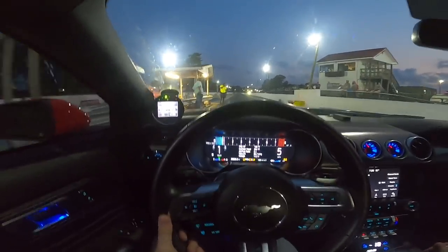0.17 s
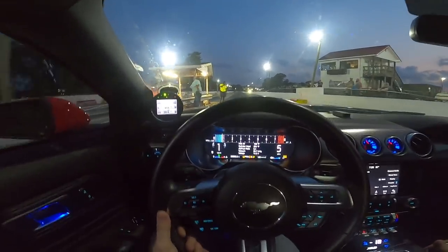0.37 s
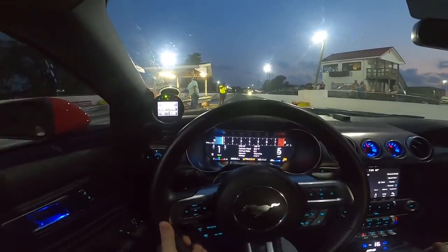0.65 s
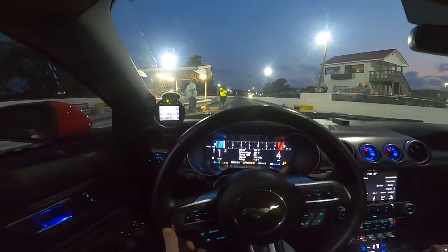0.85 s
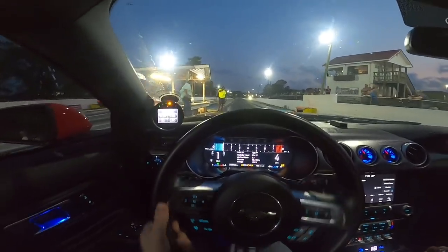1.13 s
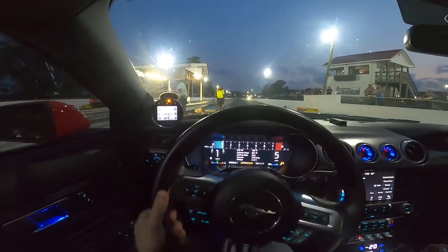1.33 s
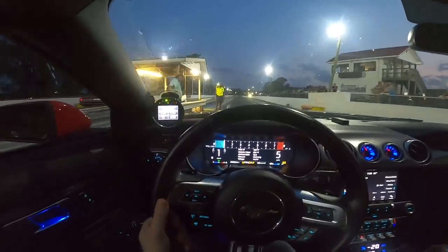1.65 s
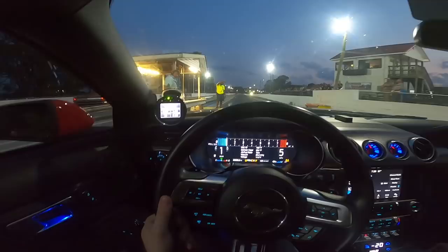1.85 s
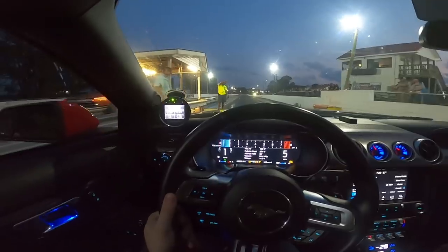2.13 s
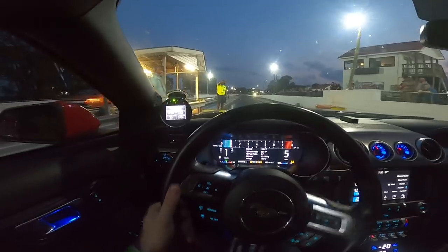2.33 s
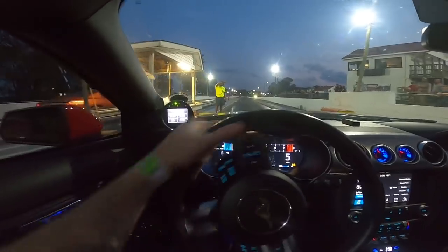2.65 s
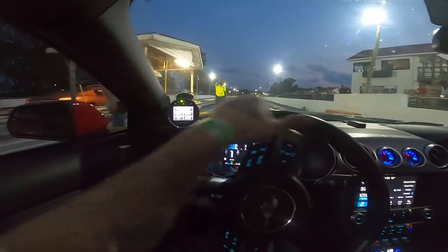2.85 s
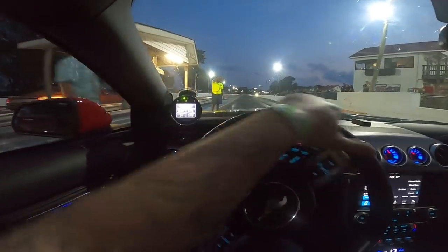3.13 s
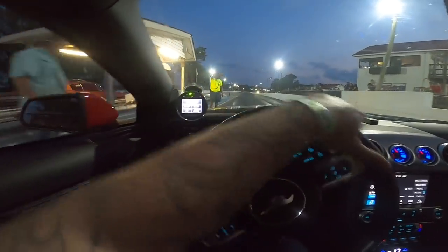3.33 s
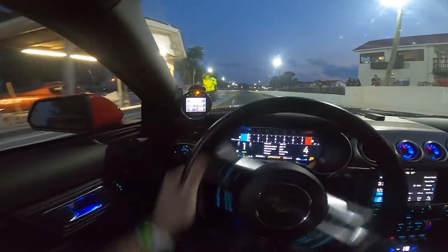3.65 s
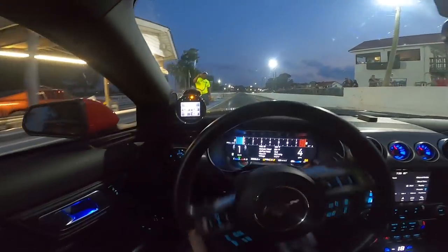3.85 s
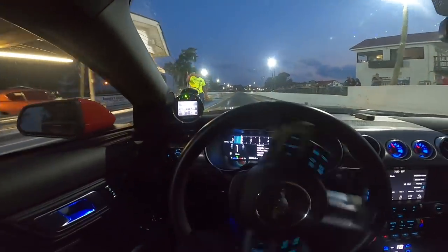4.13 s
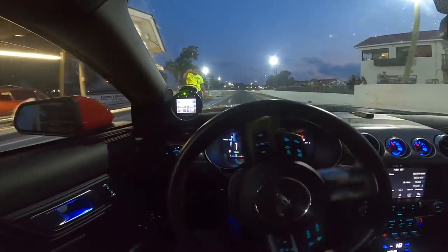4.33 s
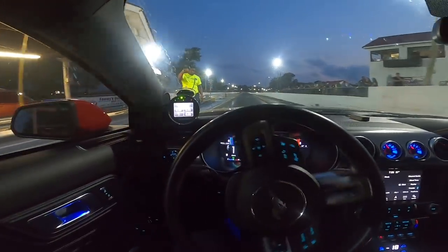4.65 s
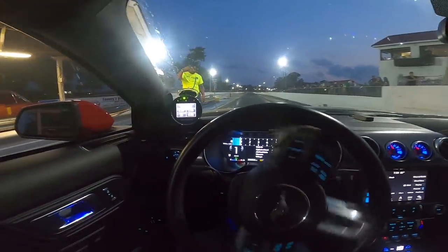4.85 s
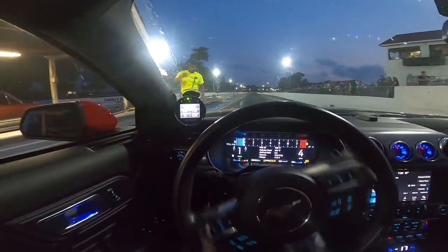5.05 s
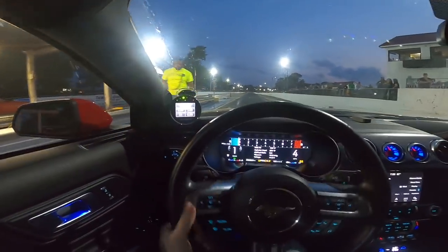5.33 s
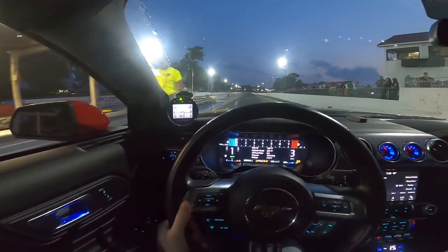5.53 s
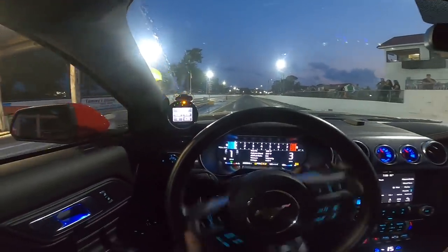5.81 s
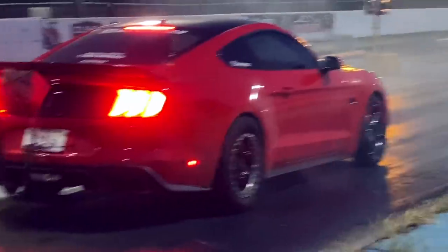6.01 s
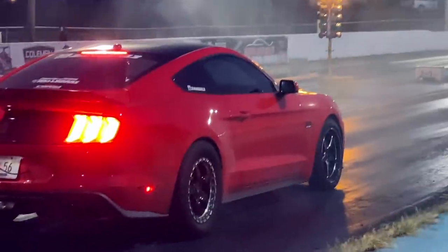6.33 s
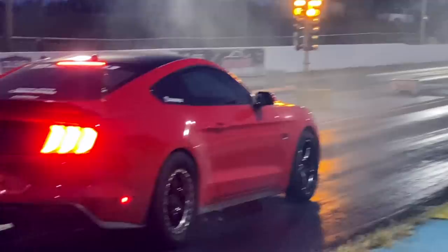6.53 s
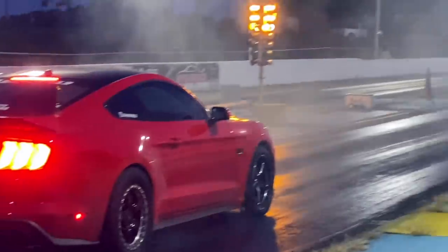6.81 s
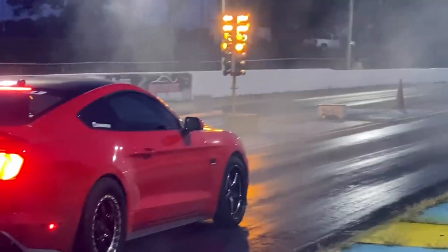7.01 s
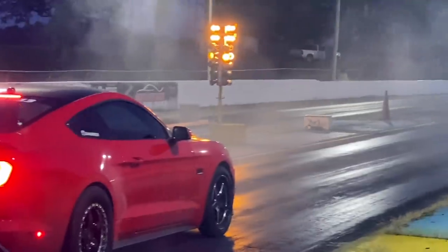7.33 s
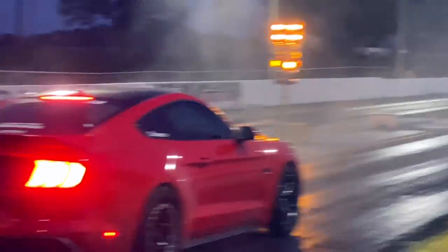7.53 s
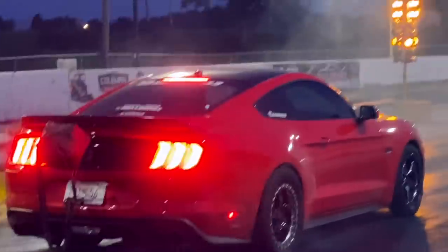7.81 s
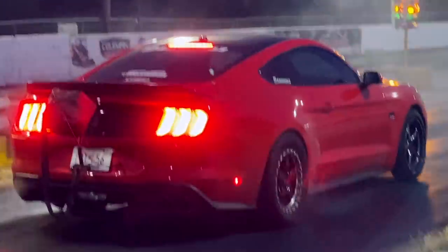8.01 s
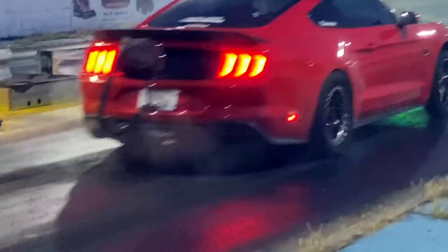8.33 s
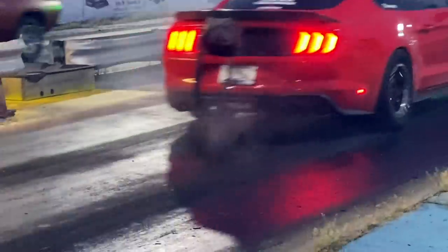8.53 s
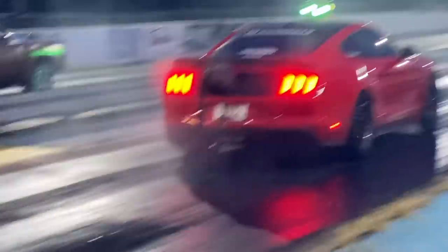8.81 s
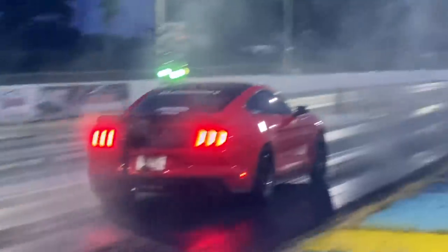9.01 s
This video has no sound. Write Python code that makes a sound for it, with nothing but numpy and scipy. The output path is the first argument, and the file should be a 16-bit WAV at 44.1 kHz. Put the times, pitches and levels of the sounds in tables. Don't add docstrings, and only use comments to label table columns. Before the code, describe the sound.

Inside a closed car, a low engine boom with muffled outside revs, wheel creaks and rubs; then a lumpy trackside engine roars away at full throttle.

```python
import sys
import numpy as np
from scipy import signal
from scipy.fft import rfft, irfft, next_fast_len
from scipy.io import wavfile

SR = 44100
rng = np.random.default_rng(int(sys.argv[2]) if len(sys.argv) > 2 else 0)


def decibels_to_gain(level_db):
    exponent = np.asarray(level_db, float) / 20
    return 10 ** exponent


def to_wav(sig):
    pcm = np.clip(np.atleast_2d(sig), -1, 1) * 32767
    pcm = np.round(pcm).astype(np.int16)
    wavfile.write(sys.argv[1], SR, pcm.T)


N = 403956


def rms_one(x):
    return x / np.sqrt(np.mean(x ** 2) + 1e-20)


def in_time(rows):
    s, *columns = np.transpose(rows)
    at = np.arange(max(round(s[0] * SR), 0), min(round(s[-1] * SR), N))
    return at, [np.interp(at / SR, s, column) for column in columns]


def at_hz(points, hz):
    table_hz, table_db = np.transpose(points)
    return np.interp(np.log(hz), np.log(table_hz), table_db)


def drift(rate, size):
    r = np.exp(-80 * np.pi * rate / SR)
    white = rng.standard_normal(size // 40 + 2002)
    slow = signal.lfilter([1], [1, -2 * r, r * r], white)[2000:]
    return np.interp(np.arange(size) / 40, np.arange(len(slow)), rms_one(slow))


def noise(spectrum, size, patchy_db):
    white = rng.standard_normal(next_fast_len(size))
    hz = np.arange(len(white) // 2 + 1) * SR / len(white) + 1e-3
    inside = (hz > spectrum[0][0]) & (hz < spectrum[-1][0])
    shaped = rfft(white) * decibels_to_gain(at_hz(spectrum, hz)) * inside
    coloured = irfft(shaped, len(white))[:size]
    return rms_one(coloured * decibels_to_gain(patchy_db * drift(17, size)))


def bump(t, s, width):
    return np.exp(-((t - s) / width) ** 2)


def bumps(rows, t):
    return sum(decibels_to_gain(db) * bump(t, s, width) for s, width, db in rows)


def rings(rows, t):
    out = np.zeros(len(t))
    for s, width, hz, band_hz, db in rows:
        near = np.abs(t - s) < 3 * width
        turn, size = 2 * np.pi * hz * t[near], near.sum()
        wave = drift(band_hz, size) * np.cos(turn) + drift(band_hz, size) * np.sin(turn)
        out[near] += bumps([(s, width, db)], t[near]) * wave
    return out


def bursts(times, levels_db, pitches_hz, below, above, decay):
    out, t = np.zeros(N), np.arange(1500) / SR
    shape = np.exp(-t / decay) * (1 - np.exp(-t / 0.00048))
    whites = rng.standard_normal((len(times), len(t)))
    for s, db, hz, white in zip(times, levels_db, pitches_hz, whites):
        band = signal.butter(2, [hz * below, min(hz * above, 15500)], "band", fs=SR, output="sos")
        start = round(s * SR)
        out[start:start + len(t)] += decibels_to_gain(db) * rms_one(signal.sosfilt(band, white)) * shape
    return out


def firing(cylinder_db, k):
    return np.angle(np.fft.fft(decibels_to_gain(cylinder_db)))[int(k) % 8]


CABIN_CYLINDERS = [0, -5, -5, 0, -9, -11, -11, -9]


def cabin_timing(k):
    return firing(CABIN_CYLINDERS, k) - 3.7 - .012 * k * k


def orders(turns, multiples, level_db, rough_db, slip, rate, timing=cabin_timing):
    out, size = np.zeros(len(turns)), len(turns)
    for k in multiples:
        scatter = 2 * np.pi * rng.random() * (k > 16)
        phase = 2 * np.pi * k * turns + timing(k) - scatter + slip * k * drift(rate, size)
        out += decibels_to_gain(level_db(k) + rough_db * drift(rate, size)) * np.cos(phase)
    return np.sqrt(2) * out


# (time [s], firing rate [Hz], boom level [dB])
OWN_IDLE = [(0, 51.5, -14), (0.42, 52.03, -10.5), (0.569, 59.73, -14), (0.839, 68.8, -12.5),
            (1.28, 70.53, -13.5), (1.43, 69.04, -19), (1.51, 67.9, -21), (1.78, 64.9, -14),
            (1.93, 60.05, -19.5), (2.42, 55.95, -14.5), (2.85, 51.69, -9.5), (3.14, 48.64, -12.5),
            (3.34, 51, -8.5), (3.62, 58.8, -12.5), (3.87, 58.53, -12), (4.07, 57.3, -11),
            (4.71, 57.76, -11.5), (5.08, 54.26, -10)]
# (multiple of firing rate, level above boom [dB])
UNEVEN_LINES = [(0.752, -26.5), (1.249, -35.5), (1.5, -31.5), (2.25, -33.5), (2.5, -27.5), (4, -31.5),
                (5, -34.5), (6, -42.5)]
# (frequency [Hz], level [dB])
PANEL_BUZZ = [(96, -37), (108, -36), (117, -27.5), (148, -30), (163, -30.5), (176, -39.5)]


def own_engine():
    _, last_hz, last_db = OWN_IDLE[-1]
    at, (hz, boom_db) = in_time([*OWN_IDLE, (6, last_hz + .7, last_db)])
    t, size = at / SR, len(at)
    loose = np.interp(t, (2.1, 2.4), [0, 1])
    levels = {k: loose * at_hz(PANEL_BUZZ, k * hz) + (1 - loose) * -37.5 for k in (2, 3)}
    levels.update({k: boom_db + db for k, db in UNEVEN_LINES})
    levels[18.1] = -71
    turns = np.cumsum(hz) / SR
    boom = np.cos(2 * np.pi * turns + 0.095 * drift(7.0, size))
    boom = np.sqrt(2) * decibels_to_gain(boom_db + drift(30, size)) * boom
    boom = boom * (1 - .92 * bump(t, 3.14, .021))
    return boom + orders(turns, levels, levels.get, rough_db=1.2, slip=0.06, rate=4)


# (time [s], engine cycles per second [Hz], exhaust level [dB], gas flow level [dB])
FIRST_BLIP = [
    (0, 43, -15.5, -34),
    (0.097, 41, -24, -37),
    (.222, 39, -27, -37.5),
    (.41, 28, -21, -43),
    (.57, 26, -21.5, -47.5),
    (0.699, 21.5, -26.5, -48),
    (0.851, 17.7, -23.5, -57),
    (1.15, 16.6, -32, -64),
]
SECOND_BLIP = [(1.28, 20.5, -36, -59.5), (1.38, 26.4, -17, -41), (1.49, 33.5, -16, -32),
               (1.58, 38.3, -13, -28), (1.655, 43.2, -13, -30.5), (1.72, 42.8, -29, -36),
               (1.77, 41.3, -27, -35), (1.83, 38.6, -17, -33.5), (2.03, 30.3, -16, -38.5),
               (2.22, 25, -17, -43), (2.31, 22.8, -22, -45.5), (2.46, 20.9, -22, -55),
               (2.72, 18.2, -28, -73), (2.95, 18.2, -24, -80), (3.45, 15.5, -34, -90)]
# (multiple of engine cycle, level [dB])
RIVAL_TONES = [(2, -18.5), (3, -4), (4, -3.5), (5, 1.5), (6, 1.5), (7, -9.5), (8, 0), (9, -12.5),
               (10, -13.5), (11, -13.5)]
# (frequency [Hz], level [dB])
BODY_LEAK = [(60, -24), (105, -13), (128, 0), (150, -8), (178, 0), (195, -9), (215, -15), (250, -24),
             (280, -15), (300, -4), (322, -16), (346, -3), (385, -16), (420, -11), (480, -20), (700, -38)]
# (frequency [Hz], level [dB])
SIDE_GLASS = [(180, -1.5), (215, 11.5), (260, 6.5)]


def rival_blip(rows):
    at, (hz, exhaust_db, _) = in_time(rows)
    table = dict(RIVAL_TONES)
    beside = np.interp(at / SR, (.15, .32), [1, 0])

    def level(k):
        return exhaust_db + table[k] + at_hz(BODY_LEAK, k * hz) + at_hz(SIDE_GLASS, k * hz) * beside

    heard = orders(np.cumsum(hz) / SR, table, level, rough_db=3.0, slip=.04, rate=12)
    since_start = at - at[0] + N * (at[0] == 0)
    fade = np.clip(np.minimum(at[-1] - at, since_start) / 2000, 0, 1)
    out = np.zeros(N)
    out[at] = heard * fade
    return out


def rival_gas(t):
    s, _, _, flow_db = np.transpose(FIRST_BLIP + SECOND_BLIP)
    flow_db = np.interp(t, s, flow_db, right=-120)
    above = np.maximum(flow_db + 52.5, 0)
    rumble = decibels_to_gain(-22.5 - 1.18 * t + 0.2 * above)
    roar = decibels_to_gain(flow_db) + decibels_to_gain(-62)
    overrun_db = np.interp(t, (.64, .71), [4, 0])
    hiss_db = flow_db - 15 - .09 * (flow_db + 37) + overrun_db
    return rumble, roar, decibels_to_gain(hiss_db) + decibels_to_gain(-77)


# (frequency [Hz], level [dB per Hz])
FAN_COLOUR = [(220, -39), (380, -10.5), (461, -8), (496, -9), (533, -7), (657, -22.5), (951, -19),
              (1050, -18), (1280, -19.5), (1630, -27.5), (2600, -38), (3380, -57.5), (5720, -120)]


def vents(size):
    return decibels_to_gain(-57) * noise(FAN_COLOUR, size, patchy_db=2.8)


# (frequency [Hz], level [dB per Hz])
RUMBLE_COLOUR = [(44, -28), (75, -7), (88, -21.5), (102, -17), (172, -13), (209, -20.5), (281, -23),
                 (363, -35), (480, -48.5), (620, -88), (1060, -120)]
ROAR_COLOUR = [(200, -24), (340, -6.5), (416, -0.5), (481, -5), (622, -7.5), (686, -14), (1180, -13),
               (1410, -14.5), (1740, -25), (2000, -22), (2600, -55.5), (4400, -120)]
HISS_COLOUR = [(1000, -32.5), (1700, -3), (2450, -6.5), (3000, -7.5), (3950, -10), (4970, -13.5),
               (5620, -12.5), (6580, -15.5), (9500, -36.5), (12400, -69.5), (20900, -120)]
# (delay [s], level [dB])
WINDOW_ECHOES = [
    (.00082, -17),
    (.0027, -15),
]


def echoed(x, echoes):
    out = x + sum(decibels_to_gain(db) * np.roll(x, round(s * SR)) for s, db in echoes)
    return out / np.sqrt(1 + sum(decibels_to_gain(2 * db) for _, db in echoes))


def cabin_air(rumble_gain, roar_gain, hiss_gain):
    size = len(rumble_gain)
    rumble = rumble_gain * noise(RUMBLE_COLOUR, size, patchy_db=1.2)
    roar = roar_gain * noise(ROAR_COLOUR, size, patchy_db=1.8) + vents(size)
    hiss = hiss_gain * echoed(noise(HISS_COLOUR, size, patchy_db=1.0), WINDOW_ECHOES)
    return rumble, roar, hiss


# (frequency [Hz], level [dB per Hz])
THUMP_COLOUR = [(14, -14), (22, -1), (36, -4.5), (48, -16.5)]
# (time [s], width [s], level [dB])
BODY_JOLTS = [
    (0, 0.94, -33),
    (1.312, .045, -17),
    (1.58, 0.11, -37),
    (2.6, .2, -34),
    (3.28, .13, -32),
    (4.4, .5, -32),
]


def body_thump(t):
    gain = decibels_to_gain(-32) + bumps(BODY_JOLTS, t)
    return gain * noise(THUMP_COLOUR, len(t), patchy_db=2.0)


# (frequency [Hz], level [dB per Hz])
WHINE_COLOUR = [(1250, -19.5), (1340, -7.5), (1380, 3), (1430, -6.5), (1520, -23)]


def pump_whine(t):
    gain = decibels_to_gain(np.interp(t, (0, 1.2, 2.6), (-68, -60, -78)))
    return gain * noise(WHINE_COLOUR, len(t), patchy_db=4.0)


# (time [s], width [s], frequency [Hz],
# bandwidth [Hz], level [dB])
PANEL_RINGS = [
    (4.6, .5, 321, 2.5, -45),
    (5.6, .3, 322, 2.5, -48),
    (3.6, .25, 278, 4, -43),
    (.37, .06, 608, 8, -49),
    (1.93, .05, 420, 10, -35),
    (3.7, .05, 700, 30, -57),
               (1.03, .3, 140, 4.3, -24),
    (1.1, 0.26, 211, 9.5, -31),
    (1.08, .3, 281, 5.5, -38.5),
    (1.93, 0.22, 2370, 110, -60.5),
    (1.92, .17, 3570, 150, -65.5),
    (2.1, .17, 3980, 150, -64.5),
    (1.5, .13, 5490, 150, -64),
    (1.4, 0.064, 3680, 120, -63),
    (1.55, .12, 370, 40, -31.5),
]
LEATHER_SQUEAKS = [(2.641, 0.0083, 1100, 60, -47), (2.697, .004, 2300, 100, -56),
                   (2.81, .004, 3400, 150, -54), (2.838, .006, 3500, 150, -63), (2.89, .03, 4500, 300, -67),
                   (3.63, .01, 1400, 50, -47.5), (4.93, .02, 1300, 200, -54),
                   (2.414, .006, 1620, 299.8, -46.5), (4.486, .012, 5700, 300, -63.5),
                   (4.81, .01, 6000, 300, -65), (4.867, .005, 3000, 150, -60)]


def cabin_rings(t):
    return rings(PANEL_RINGS + LEATHER_SQUEAKS, t)


# (time [s], tick peak level [dB], tick centre [Hz], knock level [dB])
RIM_CREAKS = [(.935, -58, 2290, -58), (1.221, -54, 2230, -46), (1.238, -49, 2270, -44),
              (2.408, -43.5, 2250, -35.5), (2.5974, -58, 2214, -52), (2.633, -49, 2288, -48),
              (2.6956, -52, 2377, -52), (2.73, -62, 2190, -53), (2.808, -57, 2314, -56.5),
              (3.558, -46.5, 2200, -59), (3.6266, -39.5, 2200, -41), (3.664, -50, 2220, -59),
              (4.1495, -41.5, 2570, -52), (4.1753, -56, 2266, -52), (4.3309, -54.5, 2217, -56.5),
              (4.4814, -53, 2203, -57), (4.8079, -56, 2190, -65.5), (4.8648, -50, 2243, -63),
              (4.893, -53, 2248, -47), (4.924, -60, 2310, -45.5), (4.9457, -52.5, 2252, -50),
              (5.4297, -55, 2380, -60), (2.5283, -58.5, 2210, -54), (3.3266, -63, 2300, -56),
              (3.3474, -58, 2330, -55), (3.9381, -55, 2291, -59), (3.994, -57, 2308, -55),
              (5.1651, -65.5, 2204, -61), (5.6486, -60, 2197, -57), (3.6137, -51, 2310, -56),
              (5.2411, -61, 2300, -62), (5.5528, -60.5, 2296, -62), (5.7598, -60, 2300, -63),
              (5.814, -58, 2300, -62), (5.8572, -59, 2300, -62)]


def creaks():
    s, tick_db, hz, knock_db = np.transpose(RIM_CREAKS)
    ticks = bursts(s, tick_db - 4, hz, below=.55, above=2.6, decay=.005)
    dull = signal.butter(2, 9500, "low", fs=SR, output="sos")
    knocks = bursts(s, knock_db - 1.0, 1250 + 0 * s, below=0.75, above=1.45, decay=0.009)
    return signal.sosfilt(dull, ticks) + knocks


def strokes(rows, t):
    out = np.zeros(len(t))
    for s, decay, db in rows:
        rise = np.clip((t - s) / 0.016, 0, 1)
        out += decibels_to_gain(db) * rise * np.exp(-np.maximum(t - s, 0) / decay)
    return out


# (time [s], decay [s], dull rub level [dB], hiss level [dB])
HAND_STROKES = [(1.22, .03, -54, -71.5), (2.405, 0.013, -50, -62), (2.6, 0.043, -58.5, -71),
                (2.635, 0.056, -56.5, -62), (2.69, 0.021, -54, -66), (2.8, 0.056, -59, -60.5),
                (2.87, 0.045, -62.5, -65), (3.3, 0.11, -58, -72.5), (3.5, 0.088, -60, -71),
                (3.556, 0.039, -56, -65.5), (3.626, 0.037, -56, -62), (3.7, 0.22, -60.5, -69),
                (3.94, .1, -62.5, -69), (4.01, 0.11, -59.5, -68), (4.15, 0.037, -56.5, -66),
                (4.22, 0.14, -61.5, -70.5), (4.33, .06, -57, -71), (4.48, 0.028, -58.5, -62.5),
                (4.555, 0.13, -61.5, -69), (4.805, 0.07, -60.5, -68), (4.865, .05, -55.5, -72),
                (4.92, 0.11, -58, -67.5), (5.05, 0.068, -61, -71.5), (5.325, 0.043, -70, -68),
                (5.43, 0.03, -66, -64), (5.506, 0.088, -70.5, -64), (5.7, 0.14, -68.5, -73)]


def hand_rubs(t):
    s, decay, dull_db, hiss_db = np.transpose(HAND_STROKES)
    dull = strokes(zip(s, decay, dull_db), t)
    hiss = strokes(zip(s, decay, hiss_db + 2.5), t)
    return dull, hiss * decibels_to_gain(1.5 * drift(60, len(t)))


def cabin():
    at = np.arange(6 * SR)
    t = at / SR
    rumble_gain, roar_gain, hiss_gain = rival_gas(t)
    rub_gain, rub_hiss_gain = hand_rubs(t)
    gains = rumble_gain, roar_gain + rub_gain, hiss_gain + rub_hiss_gain
    mid = own_engine() + body_thump(t) + sum(cabin_air(*gains)) + pump_whine(t) + cabin_rings(t)
    mid += (rival_blip(FIRST_BLIP) + rival_blip(SECOND_BLIP) + creaks())[:len(at)]
    mid = 0.97 * np.tanh(mid / 0.91)
    rumble, roar, hiss = cabin_air(*gains)
    side = decibels_to_gain(-16.0) * rumble + decibels_to_gain(-7.0) * roar + decibels_to_gain(-2.0) * hiss
    late = np.concatenate([mid[:1], mid[:-1]])
    out = np.zeros((2, N))
    out[:, at] = np.array([late + side, mid - side]) * decibels_to_gain([[.4], [-.4]])
    return out


def throttle_open(t):
    return np.interp(t, (7.79, 7.835), [0, 1])


def brake_release(t):
    return np.interp(t, (7.8, 7.92), [0, 1])


def low_order_db(t):
    return 5.5 - 24.5 * np.maximum(t - 8.2, 0) ** 2


def exhaust_levels(t):
    opened = throttle_open(t)
    flow_db = opened * (8.5 - 5.5 * (t - 7.835) + .83 * drift(28, len(t)))
    beat_db = -14 + 1.5 * opened - 5.5 * np.interp(t, (7.86, 7.95), [0, 1])
    roar_db = -30.5 + flow_db + 0.5 * opened
    flow_db = flow_db - 1.5 * opened * np.interp(t, (7.8, 8.2), [1, 0])
    hiss_db = -35 + .99 * flow_db
    air_db = -38 + .78 * flow_db - 3 * bump(t, 8.7, .2)
    return beat_db, roar_db, hiss_db, air_db


# (multiple of engine cycle, level [dB])
HOLD_TONES = [(1, -44), (2, -23.5), (3, -11.5), (4, -25.5), (5, -4), (6, -6.5), (7, -14.5), (8, -4),
              (9, 0.5), (10, -9.5), (11, -5.5), (12, -20), (13, -4), (14, -3.5), (15, -9), (16, -15),
              (17, -15.5), (18, -21.5), (19, -26), (20, -24.5), (21, -17.5), (22, -28), (23, -29),
              (24, -23),
              (25, -23), (26, -24), (27, -22.5), (28, -24.5), (29, -25), (30, -21.5), (31, -27), (32, -30.5),
             (33, -28), (34, -32.5), (35, -29.5), (36, -22), (37, -30), (38, -28.5), (39, -25.5), (40, -27),
             (41, -27.5), (42, -25), (43, -24), (44, -27.5), (45, -26), (46, -29.5)]
PULL_TONES = [(1, -49.5), (2, -10), (3, -15), (4, -6.5), (5, -6.5), (6, -6.5), (7, -1.5), (8, 2.5),
              (9, -11.5), (10, -8), (11, -17.5), (12, -17.5), (13, -8), (14, -11), (15, -10), (16, -27),
              (17, -13.5), (18, -19), (19, -23.5), (20, -7.5), (21, -13.5), (22, -14), (23, -12), (24, -11),
              (25, -13), (26, -18.5), (27, -18), (28, -8.5), (29, -17), (30, -22)]
AWAY_TONES = [(1, -42), (2, -17), (3, -25), (4, -13), (5, -9), (6, -11), (7, -8.5), (8, 0), (9, -14),
              (10, -10.5), (11, -17), (12, -15.5), (13, -10), (14, -12.5), (15, -13.5), (16, -26.5),
              (17, -18), (18, -20), (19, -26), (20, -15), (21, -10), (22, -15), (23, -21.5), (24, -16.5),
              (25, -16), (26, -26), (27, -24), (28, -22), (29, -18.5), (30, -24), (31, -24), (32, -20.5),
              (33, -24), (34, -24)]
# (time [s], level [dB])
GROUND_SWELL = [(7.79, -24.5), (7.86, -14), (7.93, -18), (7.98, -24), (8.02, -22), (8.15, -33),
                (8.32, -22.5), (8.6, -23.5), (9.0, -20), (9.1, -24), (9.16, -26)]
HOLD_CYLINDERS = [-7, -9.5, -8.5, -11, -3.5, -13.5, -2, -.5]
PULL_CYLINDERS = [-6.5, -.5, -5.5, -5.5, -12, -2, -7.5, -1.5]
AWAY_CYLINDERS = [-7, -11.5, -4, -10.5, -12, -3.5, -6.5, -1]


def exhaust_beat(t, turns, hz, beat_db, roar_db):
    opened, pull, bass_db = throttle_open(t), brake_release(t), low_order_db(t)
    away = np.interp(t, (8.62, 8.82), [0, 1])
    hold, full, behind = dict(HOLD_TONES), dict(PULL_TONES), dict(AWAY_TONES)
    swing = np.sin(2 * np.pi * np.clip((t - 7.78) / 0.63, 0, 1))
    sag_db = 5.64 * np.maximum(swing, 0)
    rasp_db = 4 * bump(t, 8.48, .13)
    firing_db = np.interp(t, *np.transpose(GROUND_SWELL))

    def level(k):
        held = beat_db + hold[k] - 7.0
        if k == 8:
            return (1 - opened) * held + opened * firing_db
        source_db = beat_db - 6.5 if k < 16 else roar_db + 2.0
        pulling = full.get(k, -15) + source_db + bass_db * (k < 4)
        if k > 2:
            pulling = (1 - away) * pulling + away * (-21 + behind.get(k, -27.0))
        if 18 < k < 32:
            pulling = pulling + rasp_db * np.exp(-((k * hz.max() - 1020 * 1.03) / 140) ** 2)
        return (1 - pull) * held + pull * (pulling - 30.0 * (k > 36)) - sag_db * (k > 10)

    def timing(k):
        if k > 16:
            return 0
        held = firing(HOLD_CYLINDERS, k) - 1.13
        pulled = firing(PULL_CYLINDERS, k) - .1
        gone = firing(AWAY_CYLINDERS, k) + .75
        return held + pull * (pulled - held) + away * (gone - .014 * k * k - pulled)

    rough_db = 1.1 + .4 * pull
    slip = .012 + .006 * pull
    return orders(turns, hold, level, rough_db, slip, rate=7, timing=timing)


# (frequency [Hz], level [dB per Hz])
BOOM_COLOUR = [(35, -47.5), (60, -10), (139, -9.5), (182, -7.5), (241, -6), (316, -5.5), (382, -3),
               (520, -22), (680, -55), (1140, -120)]
HOLD_ROAR_COLOUR = [(260, -23.5), (440, -3.5), (494, -4), (566, -2), (912, -13), (1170, -6), (1540, -13.5),
                    (1900, -22.5), (2470, -43.5), (4180, -120)]
OPEN_ROAR_COLOUR = [(260, -37), (440, -8.5), (587, -2), (647, -8), (802, -5), (1130, -2.5), (1230, -8),
                    (1900, -11.5), (2470, -46.5), (4180, -120)]
GAS_COLOUR = [(880, -26.5), (1500, -5.5), (2230, -5.5), (2400, -6.5), (2810, -9), (3140, -7.5), (4400, -11),
              (6800, -17.5), (8840, -43), (15000, -120)]
AIR_COLOUR = [(3530, -21.5), (6000, -0.5), (9680, -3), (14000, -4), (15600, -7)]


def exhaust_gas(t, puff, beat_db, roar_db, hiss_db, air_db):
    pull, size = brake_release(t), len(t)
    boom_db = beat_db - 17 + 1.5 * pull + low_order_db(t)
    boom = decibels_to_gain(boom_db) * noise(BOOM_COLOUR, size, patchy_db=.8) * puff
    held = noise(HOLD_ROAR_COLOUR, size, patchy_db=1.4)
    opened = noise(OPEN_ROAR_COLOUR, size, patchy_db=1.2)
    roar = decibels_to_gain(roar_db + 0.37 * pull) * ((1 - pull) * held + pull * opened) * puff
    hiss = decibels_to_gain(hiss_db + 2.5) * noise(GAS_COLOUR, size, patchy_db=1.0) * puff ** 0.54
    air = decibels_to_gain(air_db + 2.5) * noise(AIR_COLOUR, size, patchy_db=0.57) * puff
    return boom + roar + hiss + air


# (time [s], width [s], frequency [Hz], bandwidth [Hz], level [dB])
WALL_RINGS = [(7.4, 1.5, 3193, 40, -45), (5.6, 0.87, 3400, 46, -45), (6.8, 1.5, 1179, 60, -46),
              (7.88, .08, 395.4, 27, -21.5), (6.3, .5, 76, 12, -31.5), (7.55, .12, 70.1, 10, -31.5),
              (7.7, .05, 7356, 500, -39), (7.93, .08, 893, 220, -28), (8.03, .06, 1390, 30, -31),
              (8.2, .14, 2490, 400, -34), (8.37, 0.077, 713, 45, -30.5), (8.2, 0.11, 655, 39.7, -33.5),
              (8.5, .12, 1030, 110, -29), (8.85, 0.27, 2440, 120, -39.5), (8.85, .25, 3777, 80, -42),
              (9.0, 0.19, 858, 59.6, -30), (9.0, 0.17, 2793, 169.7, -38.5)]


def wall_rings(t, puff):
    return rings(WALL_RINGS, t) * puff


# (time [s], peak level [dB])
FINE_STONES = [
    (8.4717, -24),
    (8.783, -18),
    (8.791, -15),
    (8.808, -18),
    (8.833, -18),
    (8.857, -21),
    (8.865, -18),
    (8.8814, -24),
]
COARSE_STONES = [(8.9396, -26.5), (8.9533, -15), (8.9628, -18.5), (8.978, -18), (8.998, -16), (9.0276, -22),
                 (9.0397, -18.5), (9.007, -18.5), (9.06, -17.5), (9.085, -20.5), (9.1, -23), (9.122, -26)]


def grit():
    s, db = np.transpose(FINE_STONES)
    s_low, db_low = np.transpose(COARSE_STONES)
    fine = bursts(s, db - 2.5, 12500 + 0 * s, below=0.81, above=1.1, decay=0.0015)
    return fine + bursts(s_low, db_low - 5.5, 7000 + 0 * s_low, below=0.77, above=1.4, decay=0.0036)


def sharp_crack():
    return bursts([8.6], [-24], [1800], below=0.43, above=3.3, decay=0.0032)


# (time [s], engine cycles per second [Hz])
TRACK_SPEED = [(5.9, 27.12), (6.2, 27.35), (6.46, 27.48), (6.72, 27.56), (6.98, 27.62), (7.24, 27.65),
               (7.79, 27.67), (7.98, 38), (8.03, 40.6), (8.2, 40.55), (8.45, 40.45), (8.65, 40.65),
               (8.9, 40.93), (9.0, 41.15), (9.1, 41.6), (9.16, 42)]


def trackside():
    at, (hz,) = in_time(TRACK_SPEED)
    t, turns = at / SR, .52 + np.cumsum(hz) / SR
    beat_db, roar_db, hiss_db, air_db = exhaust_levels(t)
    puff = decibels_to_gain(.6 * np.cos(2 * np.pi * (turns - .7)) + .8 * np.cos(16 * np.pi * turns))
    out = np.zeros(N)
    out[at] = exhaust_beat(t, turns, hz, beat_db, roar_db) + wall_rings(t, puff)
    out[at] += exhaust_gas(t, puff, beat_db, roar_db, hiss_db, air_db)
    return out + grit() + sharp_crack()


def scene():
    outside = np.interp(np.arange(N) / SR, (5.914, 5.93), [0, 1])
    no_bass = signal.butter(4, 58, "high", fs=SR, output="sos")
    far = signal.sosfilt(no_bass, trackside())
    return cabin() * (1 - outside) + .56 * np.tanh(far / .56) * outside


def band_limit(x):
    return signal.sosfilt(signal.butter(12, 15710, fs=SR, output="sos"), x)


def record(dry):
    return band_limit(dry)


dry = scene()
out = record(dry)
to_wav(out)
```